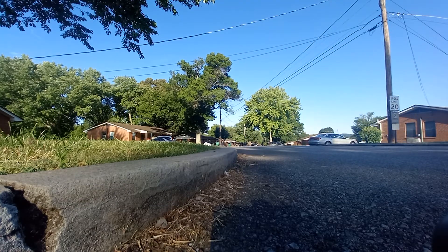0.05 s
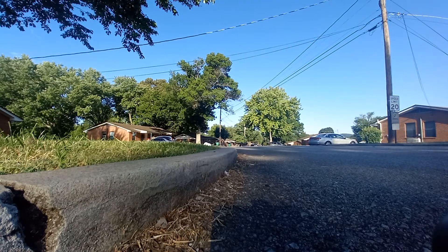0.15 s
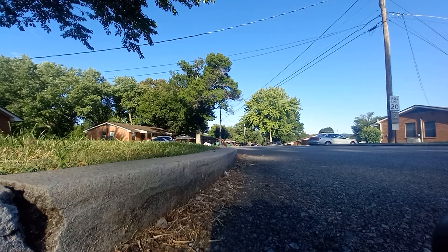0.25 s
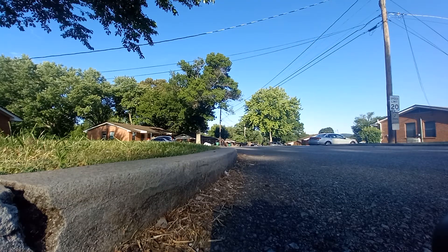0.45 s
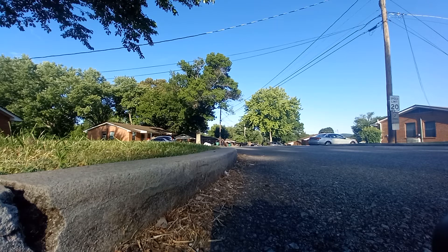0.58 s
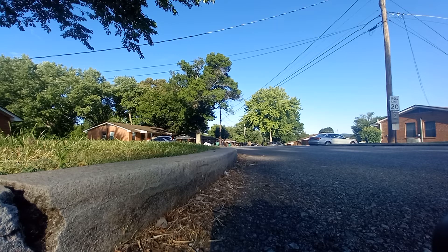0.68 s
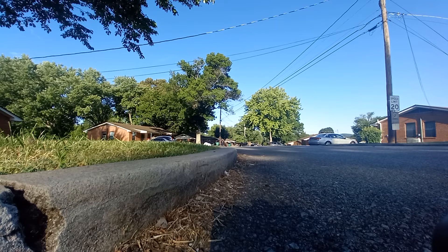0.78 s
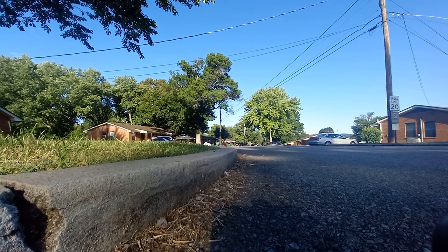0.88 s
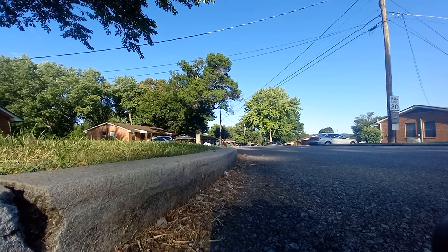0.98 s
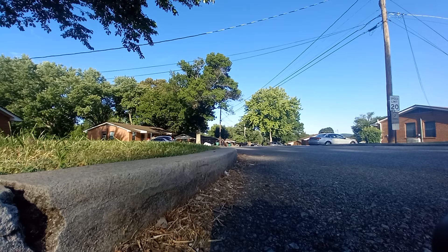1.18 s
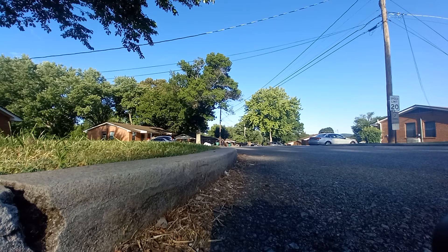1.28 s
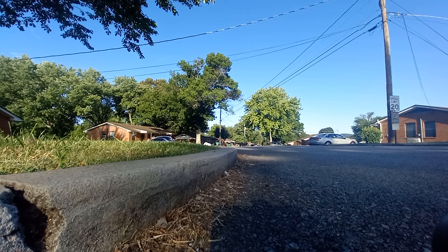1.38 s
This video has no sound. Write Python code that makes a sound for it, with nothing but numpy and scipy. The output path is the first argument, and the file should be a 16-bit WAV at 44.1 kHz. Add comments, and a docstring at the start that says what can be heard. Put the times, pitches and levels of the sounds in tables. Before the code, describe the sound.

On a residential street, a skateboard's wheels grind briefly over asphalt to the right, then the board lands with a sharp clack and clatters to rest. A slight echo comes off the houses, and far traffic rumbles underneath.

```python
"""Far traffic rumbles as a skateboard rolls on rough asphalt, right of a camera lying at the kerb.
The board clacks down hard once and rattles through smaller knocks before it stops. Each knock rings
the deck and sprays grit; houses across the street echo the deck. One faint squeak comes near the end.
The left microphone port hears the board late and through the shadow of the camera."""
import sys
import numpy as np
from scipy import signal
from scipy.fft import rfft, irfft, next_fast_len
from scipy.io import wavfile
from scipy.ndimage import map_coordinates

SR = 44100
rng = np.random.default_rng(int(sys.argv[2]) if len(sys.argv) > 2 else 0)


def file_out(sig):
    """Save sig as 16-bit WAV at sys.argv[1]."""
    # one column per channel
    cols = np.atleast_2d(sig).T
    # limit, then scale
    lim = np.clip(cols, -1, 1)
    pcm = np.round(lim * 32767).astype(np.int16)
    wavfile.write(sys.argv[1], SR, pcm)


N = 63945
TIME_S = np.arange(N) / SR


def amp(db):
    return 10 ** (np.asarray(db) / 20)


def unit_rms(x):
    return x / np.sqrt(np.mean(x ** 2) + 1e-20)


def at_hz(rows, hz, column=1):
    """Table column interpolated over log frequency."""
    columns = np.transpose(rows)
    return np.interp(np.log(hz + 1), np.log(columns[0] + 1), columns[column])


def over_time(rows, column=1):
    """Table column interpolated per sample."""
    columns = np.transpose(rows)
    return np.interp(TIME_S, columns[0], columns[column])


def wander(points_per_s):
    """Smooth curve through random points."""
    return map_coordinates(rng.standard_normal(N), [TIME_S * points_per_s])


def filtered(x, response):
    """Apply a complex frequency response."""
    size = next_fast_len(N + SR // 2)
    return irfft(rfft(x, size) * response(np.fft.rfftfreq(size, 1 / SR)), size)[..., :N]


def coloured(x, spectrum):
    """Apply a dB spectrum that goes to -90 dB two octaves beyond its ends."""
    rows = [(spectrum[0][0] / 4, -90), *spectrum, (spectrum[-1][0] * 4, -90)]
    return filtered(x, lambda hz: amp(at_hz(rows, hz)))


def stereo_noise(coherence):
    """White noise at both ports with the given coherence."""
    def weights(hz):
        angle = np.arccos(np.clip(at_hz(coherence, hz), 0, 1)) / 2
        return [np.cos(angle), np.sin(angle)]
    mid, side = filtered(rng.standard_normal((2, N)), weights)
    return np.array([mid + side, mid - side])


# Left port relative to right. Each row: frequency in Hz, gain in dB, extra phase in rad.
CAMERA_SHADOW = [(100, -13, 0.5), (279, 1.5, -0.18), (490, 4, -0.34), (650, -3.5, -0.46), (892, -4, 0.56),
                 (1097, 3, 0.55), (1343, 4.5, 0.73), (1870, 1, -0.01), (2150, 3.5, -0.5),
                 (2450, -12.5, -0.64), (2920, -3, 0.52), (4340, -5, 0.5), (5240, 2, 2), (6800, -13, 2.7),
                 (7400, -6.5, 4.5), (8840, -0.5, 3.5), (10000, -8.5, 6.96), (16000, -5, 1.7)]
def from_right(x, lag_s=0.0004944):
    """Sound from the right reaches the left port late and shadowed."""
    def response(hz):
        phase = at_hz(CAMERA_SHADOW, hz, column=2) - 2 * np.pi * hz * lag_s
        left = amp(at_hz(CAMERA_SHADOW, hz)) * np.exp(1j * phase)
        return [left, np.ones(len(hz))]
    return filtered(x, response)


# Each row: frequency in Hz, relative noise density in dB.
ENGINE_SPECTRUM = [(13, -83.5), (22, -51.5), (47, -18.5), (70, 0.5), (140, -6.5), (162, -16), (233, -10),
                   (254, -15.5), (289, -11), (700, -34.5), (910, -38.5), (1540, -120)]
# Each row: frequency in Hz, left-right coherence from 0 to 1.
ENGINE_COHERENCE = [(100, .96), (250, .91), (500, .55)]
# Each row: time in seconds, level in dB.
ENGINE_LEVEL = [(0.0, -37), (0.084, -42.5), (0.14, -37), (0.42, -37), (0.444, -35), (0.5, -38.5),
                (0.662, -32.5), (0.69, -40.5), (1.45, -42)]
def engines(left_lead_s=0.0001):
    """Far engines rumble low, slightly from the left."""
    rumble = coloured(stereo_noise(ENGINE_COHERENCE), ENGINE_SPECTRUM)
    lead_s = np.array([[0.5], [-0.5]]) * left_lead_s
    rumble = filtered(rumble, lambda hz: np.exp(2j * np.pi * hz * lead_s))
    return amp(over_time(ENGINE_LEVEL)) * unit_rms(rumble)


# Each row: frequency in Hz, relative noise density in dB.
TYRE_SPECTRUM = [(300, -16.5), (700, 4.5), (1000, -4), (1500, -8), (2100, -19), (2800, -33), (3600, -29),
                 (5000, -50)]
# Each row: frequency in Hz, left-right coherence from 0 to 1.
TYRE_COHERENCE = [(500, 0.4), (1250, 0.85), (2000, .55), (4000, 0.23)]
def tyres(level_db=-51):
    """Far tyres roar steadily from the right."""
    roar = coloured(stereo_noise(TYRE_COHERENCE), TYRE_SPECTRUM)
    return amp(level_db) * from_right(unit_rms(roar))


# Each row: frequency in Hz, relative noise density in dB.
HISS_SPECTRUM = [(1500, -5.5), (3600, -2.5), (5500, -5.5), (7500, -6), (9000, -9), (16000, -13)]
def microphone_hiss(level_db=-79.5):
    """Each microphone adds its own noise."""
    return amp(level_db) * unit_rms(coloured(rng.standard_normal((2, N)), HISS_SPECTRUM))


# Wheel noise. Each row: time in seconds, grit level in dB, fizz level in dB.
WHEEL_LEVELS = [(0, -53.5, -65), (.04, -48, -67), (.08, -42.5, -54.5), (.12, -48, -62.5), (.19, -44.5, -64),
                (.25, -40.5, -50.5), (.32, -47, -68), (.42, -41.5, -57.5), (.5, -39, -55.5), (.6, -37, -56),
                (.67, -40, -57), (.72, -49, -66), (.76, -52, -71), (.82, -63.5, -81.5), (1.05, -70.5, -92),
                (1.16, -62, -75), (1.25, -62.5, -88), (1.45, -90.5, -94)]
def wheel_power():
    """Power of the rolling noise in two bands: grit and its treble, fizz."""
    return amp([over_time(WHEEL_LEVELS), over_time(WHEEL_LEVELS, column=2)]) ** 2


# Each row: frequency in Hz, relative noise density in dB.
GRIT_SPECTRUM = [(200, -7), (800, 0), (2200, -11), (2700, -16), (3700, -15), (5000, -32), (6000, -54)]
FIZZ_SPECTRUM = [(4000, -32), (5400, -12.5), (7000, -2), (8500, -12.5), (10000, -11.5), (12000, -13.5),
                 (14000, -14), (16000, -24.5)]
# Each row: frequency in Hz, left-right coherence from 0 to 1.
ASPHALT_COHERENCE = [(100, .97), (1500, .97), (3500, 0.68), (5500, 0.7), (16000, 0.72)]
def asphalt(band_powers, bumps_per_s=320, bump_spread_db=2.5):
    """Contact with the asphalt makes grit and fizz; its bumps shake their level."""
    bumps = unit_rms(amp(bump_spread_db * wander(bumps_per_s)))
    noise = np.zeros((2, N))
    for power, spectrum in zip(band_powers, [GRIT_SPECTRUM, FIZZ_SPECTRUM]):
        noise += np.sqrt(power) * unit_rms(coloured(stereo_noise(ASPHALT_COHERENCE), spectrum))
    return bumps * noise


# Each row: start in seconds, drive of the thud, hollow, clack and crack modes in dB, rise in seconds,
# contact t60 in seconds, grit level in dB, fizz level in dB, t60 of both in seconds.
BOARD_KNOCKS = [(.045, -42.5, -50, -50.5, -44, .0004, 0.036, -56, -55, 0.017),
                (.058, -58.5, -55, -48, -50, 0.0011, 0.071, -48, -55, .05),
                (.07, -35, -37, -40, -46, 0.0039, 0.031, -32.5, -50, 0.077),
                (.104, -59, -54, -58.5, -40, .001, 0.047, -59, -55, .06),
                (.158, -53, -37, -44, -42, 0.0014, 0.025, -44, -46.5, 0.033),
                (.189, -50.5, -51, -51, -52, 0.00092, 0.038, -45, -50, .05),
                (.2003, -19, -28, -28, -20, .0002, 0.016, -31.5, -41.5, 0.081),
                (.225, -36.5, -46.5, -40, -26.5, 0.0087, .1, -34, -52, 0.11),
                (0.3284, -14, -9.5, -6.5, -3.5, 0.0003, 0.0032, -23, -35.5, 0.15),
                (0.338, -18, -20, -21.5, -26, 0.004, 0.04, -34, -51, 0.25),
                (.35, -44, -34, -32, -15.5, .015, 0.11, -29.5, -37, 0.099),
                (.43, -15, -18.5, -24, -46, 0.00095, 0.089, -21.5, -37.5, 0.1),
                (.452, -33, -26, -35, -33, 0.0034, 0.079, -31, -43.5, 0.12),
                (.5357, -13, -13, -25.5, -23, 0.00051, 0.035, -24.5, -39, 0.11),
                (.582, -22, -19.5, -29.5, -24, 0.0014, 0.053, -27, -42.5, 0.11),
                (.617, -14.5, -24, -31.5, -34, .002, 0.033, -28.5, -42, .05),
                (.6404, -25, -19.5, -29.5, -26, 0.00044, 0.069, -27, -41, 0.058),
                (.6843, -32.5, -28, -40, -37, .002, .05, -42.5, -56, 0.1),
                (0.721, -53.5, -48.5, -55, -45, 0.00034, .03, -52, -55, 0.026),
                (1.127, -66, -58.5, -52, -54, .01, 0.15, -66.5, -86.5, 0.076),
                (1.169, -65, -54, -64, -53.5, 0.0036, 0.11, -46, -68, 0.093)]
def knocks(scrape_db=-19.5, sharp_rise_s=0.001, snap_over_fizz_db=7, snap_t60_s=0.0085):
    """Each knock is a blow, then rough contact. Returns deck forces and grit and fizz power."""
    roughness = rng.standard_normal(N)
    forces, spray_power = np.zeros((4, N)), np.zeros((2, N))
    for start_s, *drive_db, rise_s, contact_t60_s, grit_db, fizz_db, spray_t60_s in BOARD_KNOCKS:
        age_s = np.maximum(TIME_S - start_s, 0)
        swell = 1 - np.exp(-age_s / rise_s)
        blow = np.exp(-rise_s / sharp_rise_s)  # vanishes for a slow rise
        force = amp(scrape_db - 60 * age_s / contact_t60_s) * swell * roughness
        force[round(start_s * SR)] = blow
        forces += amp(drive_db)[:, None] * force / np.linalg.norm(force)
        snap = blow * amp(fizz_db + snap_over_fizz_db - 60 * age_s / snap_t60_s) * (TIME_S > start_s)
        spray_power[1] += snap ** 2
        spray_power += (amp([[grit_db], [fizz_db]] - 60 * age_s / spray_t60_s) * swell) ** 2
    return forces, spray_power


# Each row: frequency in Hz, relative level in dB, t60 in seconds.
DECK_MODES = [(105, -8, .08), (312, -4, .05), (468, -5, .05), (570, -12, .04), (710, -6, .04),
              (829, 0, .033), (1060, -9, .03), (1254, -1, .033), (1485, -1, .036), (1695, -2.5, .033),
              (1857, -8, .03), (2293, 0, .033), (2690, -14, .016), (2976, -5, .016), (3456, -9, .014),
              (3800, -13, .012), (4300, -9, .008), (4750, -12, .008)]
# Edges in Hz of the thud, hollow, clack and crack bands.
DECK_BAND_EDGES_HZ = [0, 640, 950, 2600, 6000]
def deck(forces, swell_cycles=1.3):
    """One force rings each band of deck modes; neighbouring modes swing in opposite sense."""
    t = np.arange(SR // 8) / SR
    rings = np.zeros((4, len(t)))
    for k, (hz, db, t60_s) in enumerate(DECK_MODES):
        band = np.searchsorted(DECK_BAND_EDGES_HZ, hz) - 1
        envelope = amp(db - 60 * t / t60_s) * (1 - np.exp(-t * hz / swell_cycles))
        rings[band] += (-1) ** k * envelope * np.sin(2 * np.pi * hz * t)
    return signal.fftconvolve(forces, rings, axes=1).sum(axis=0)[:N]


# Each row: frequency in Hz, t60 in seconds.
ECHO_DECAY = [(200, 0.37), (2000, 0.34), (10000, 0.14)]
def house_echo(x, gain_db=-21.5, delay_s=0.026):
    """Houses return a diffuse echo whose treble dies first."""
    hz, t, spectra = signal.stft(rng.standard_normal((2, SR // 2)), SR, nperseg=256)
    decay = amp(-60 * t / at_hz(ECHO_DECAY, hz)[:, None])
    _, tail = signal.istft(spectra * decay, SR, nperseg=256)
    tail /= np.linalg.norm(tail[0])
    delayed = np.pad(x, (round(delay_s * SR), 0))
    return amp(gain_db) * signal.fftconvolve(delayed[None], tail, axes=1)[:, :N]


def squeak(centre_s=1.3, half_width_s=0.014, pitch_hz=2020, waver_hz=40.3, level_db=-54):
    """One faint, short tone of unsteady pitch."""
    hz = pitch_hz + waver_hz * wander(points_per_s=150)
    envelope = amp(level_db) * np.exp(-((TIME_S - centre_s) / half_width_s) ** 2)
    return envelope * np.sin(2 * np.pi * np.cumsum(hz) / SR)


def scene():
    """Board and squeak on the right, over traffic and hiss."""
    forces, spray_power = knocks()
    ringing = deck(forces)
    board = ringing + asphalt(wheel_power() + spray_power) + house_echo(ringing)
    background = engines() + tyres() + microphone_hiss()
    return background + from_right(board + squeak())


def record(dry):
    """The camera cuts off steeply at its band limit."""
    cutoff_hz = 16100
    return filtered(dry, lambda hz: 1 / (1 + (hz / cutoff_hz) ** 120))


dry = scene()
out = record(dry)
file_out(out)
```